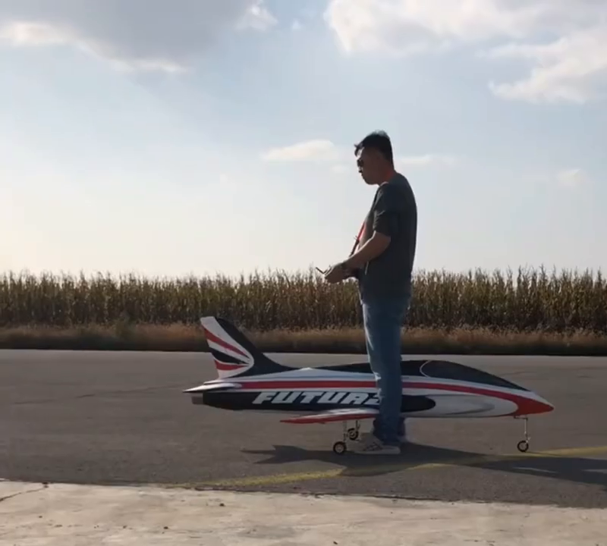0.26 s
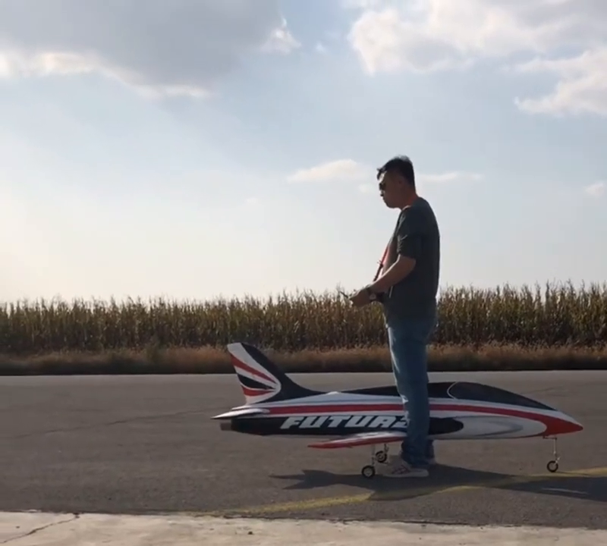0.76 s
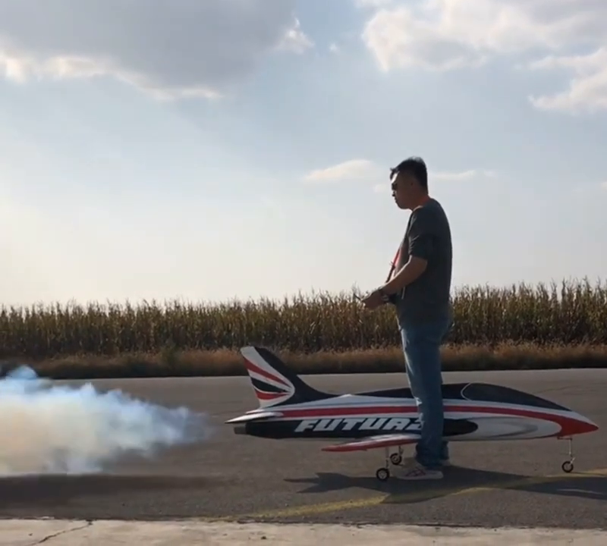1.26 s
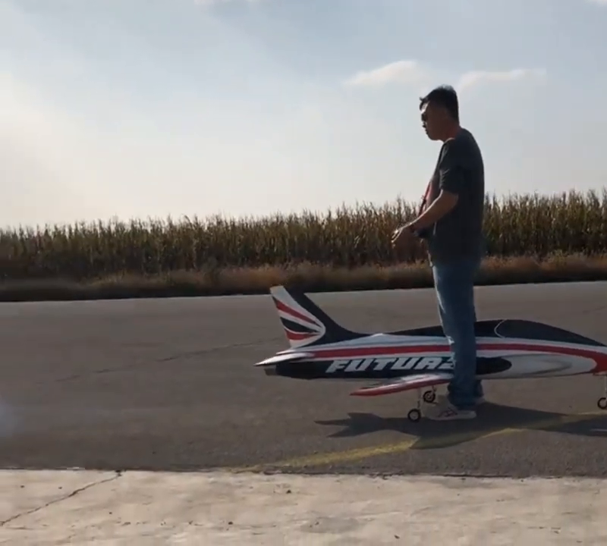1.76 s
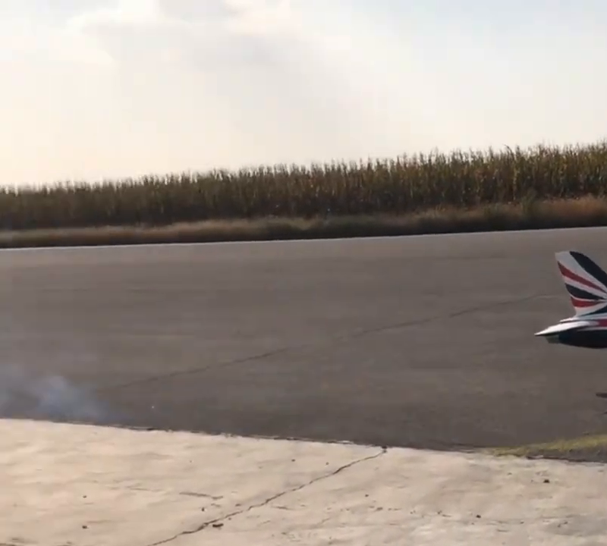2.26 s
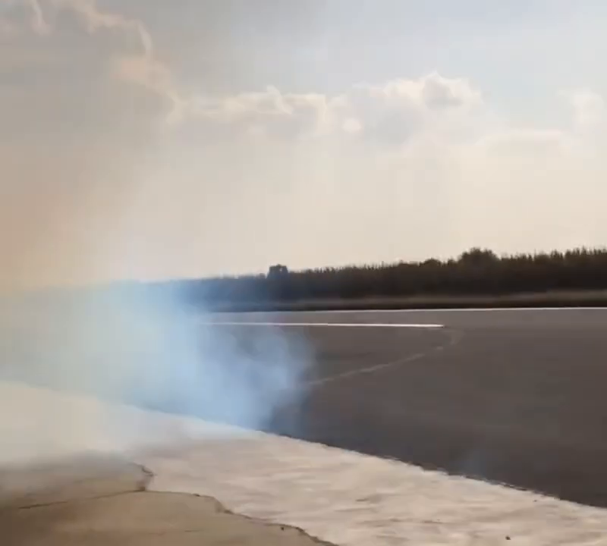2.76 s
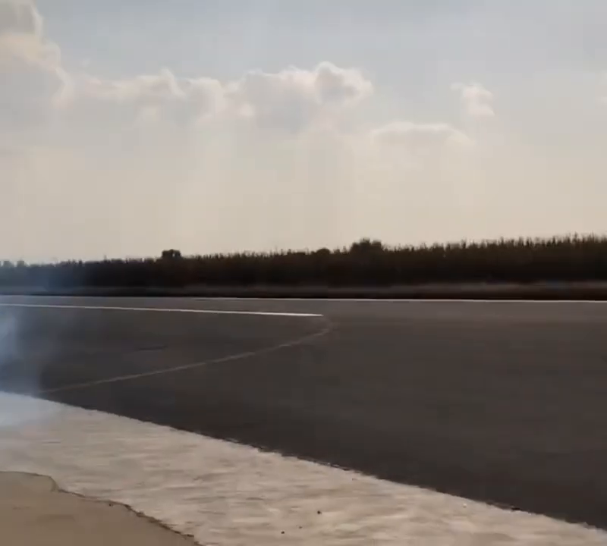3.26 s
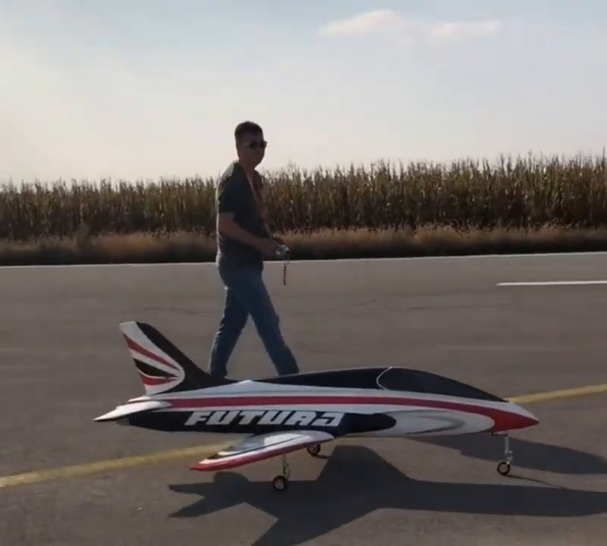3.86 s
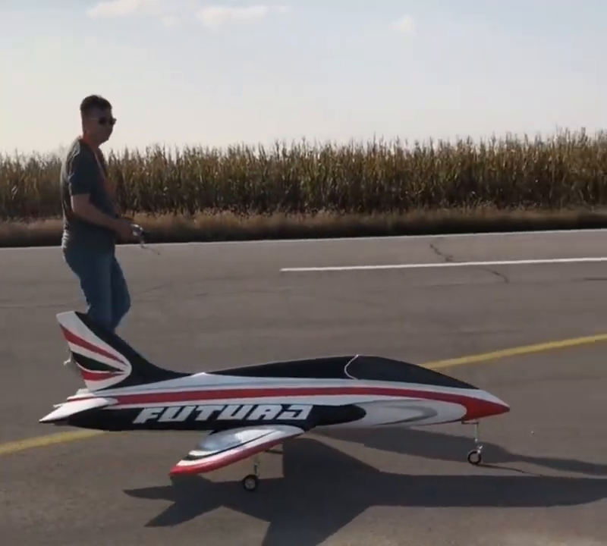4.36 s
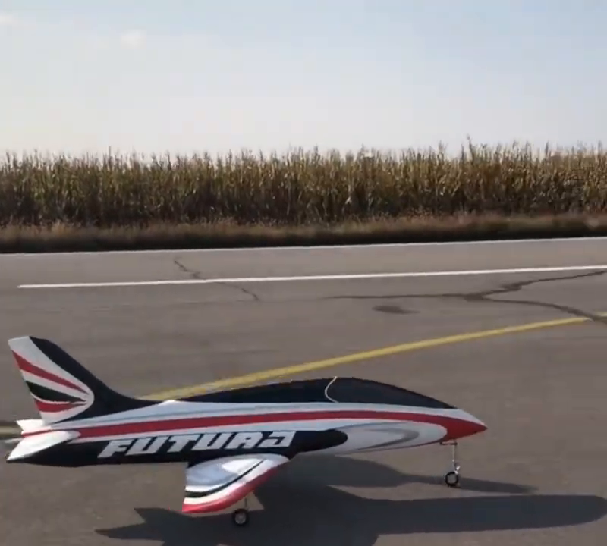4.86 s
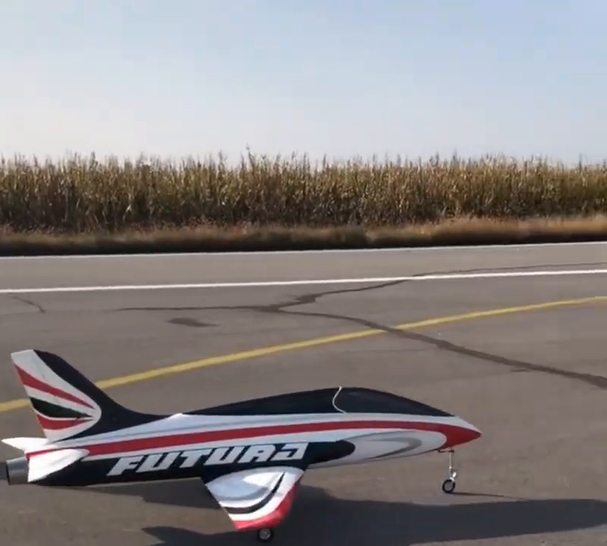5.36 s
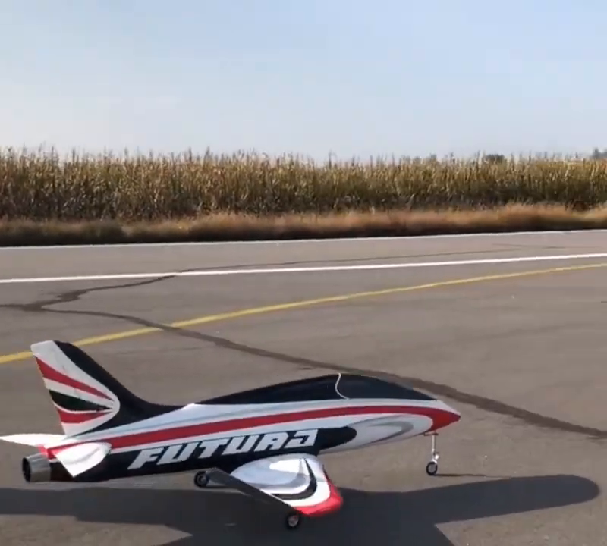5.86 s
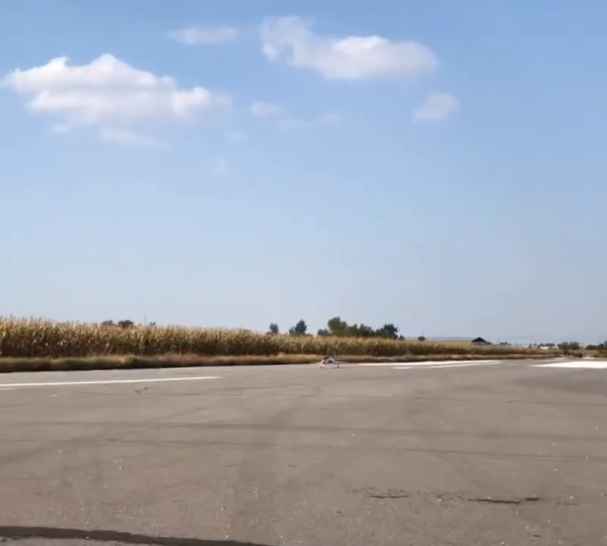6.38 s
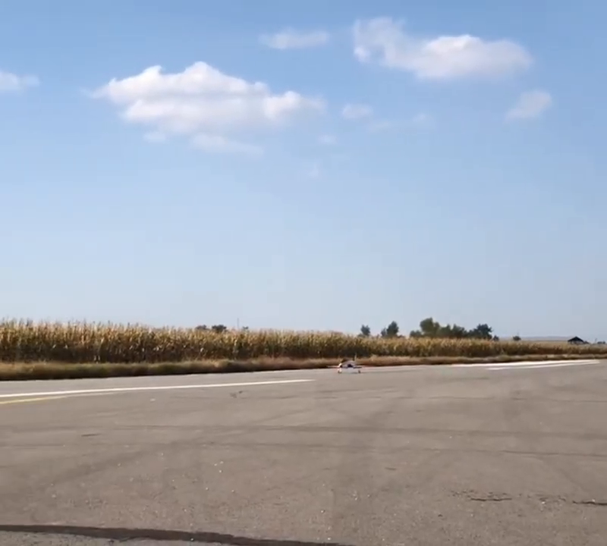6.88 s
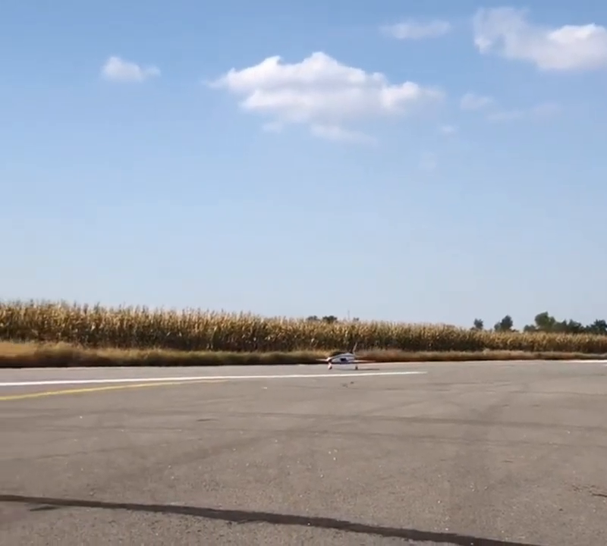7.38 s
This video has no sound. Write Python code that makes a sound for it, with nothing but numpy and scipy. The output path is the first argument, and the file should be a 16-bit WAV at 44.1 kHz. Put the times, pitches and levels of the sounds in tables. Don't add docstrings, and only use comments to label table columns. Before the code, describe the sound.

On an open asphalt runway, one handheld phone hears a brief soft far roar, a short near-silence, then a small jet turbine blasting at full thrust with a pipe howl. An abrupt cut brings a quieter rush with a high whistle sliding down in pitch and a throbbing low hum. Another cut leaves a dull distant roar that brightens, hit by wind thumps.

```python
import sys
import numpy as np
from scipy import signal
from scipy.fft import rfft, irfft, next_fast_len
from scipy.io import wavfile
from scipy.ndimage import uniform_filter1d, map_coordinates

SR = 44100
rng = np.random.default_rng(int(sys.argv[2]) if len(sys.argv) > 2 else 0)


def gain_from_db(level_db):
    decades = np.asarray(level_db, float) / 20
    return 10 ** decades


def master_out(mix):
    frames = np.transpose(np.atleast_2d(mix))
    ceiling = np.clip(frames, -1, 1)
    pcm = np.round(ceiling * 32767).astype(np.int16)
    wavfile.write(sys.argv[1], SR, pcm)


N = 336483

# [start t/s, end t/s, fade-in/ms, first fade level/dB, tail level/dB, tail fall/(dB/ms)]
VIEWS = [
    (0, .141, 1, -3, -32, 1.2),
    (.3035, 3.2765, 4, -40, -17, 2.3),
    (3.296, 6.066, 22, -15, -16, 2.0),
    (6.087, 7.7, 1, -6, -14, 2),
]
THRUST_HZ = [200, 800, 3000, 8000]
# [f/Hz, level/dB per Hz]
FAR_OFF = [(18, -47), (30, -14), (66, -13), (148, -12), (213, -6), (443, -9.5), (808, -18.5), (921, -5.5),
           (1290, -2), (1720, -16.5), (3980, -21.5), (15500, -61.5)]
FULL_POWER = [(15, -54), (60, -31), (130, -8.5), (240, -9.5), (380, -7), (800, -2.5), (1750, -0.5),
              (2080, -7), (2330, -5.5), (3300, -9.5), (7200, -9), (7700, -11), (11700, -15), (15800, -17)]
TAXI = [(15, -60), (60, -19.5), (200, -4), (400, -5), (560, -9), (850, -3.5), (1800, -13.5), (3500, -16),
        (4100, -18), (5300, -18.5), (6100, -19.5), (9000, -22.5), (13500, -26), (15800, -23.5)]
RUNWAY = [(15, -64), (40, -26), (100, -18.5), (150, -16.5), (340, -12.5), (430, -11.5), (800, -7),
          (1400, -8), (2150, -17), (2500, -23), (4500, -31.5), (7000, -37.5), (10000, -47.5), (15800, -56)]
ROAR_DB = [-26.5, -10.5, -20.5, -23.5]
# [t/s, approach (0 = stated colour, 1 = full swing)]
APPROACH = [
    [(0, .3), (.15, -0.33)],
    [(.3, -0.34), (1.3, -0.74), (1.9, 0.24), (2.4, 0.51), (3.0, 0.35), (3.3, .5)],
    [(3.3, -0.24), (3.6, -0.4), (4.5, -0.39), (4.9, -0.041), (5.4, 0.36), (6.07, 0.74)],
    [(6.09, -0.1), (6.45, 0.035), (6.65, -0.15), (6.95, 0.2), (7.3, 0.52), (7.37, 0.9), (7.5, 1),
     (7.63, 0.88)],
]
# [rumble/dB, roar/dB, rush/dB, hiss/dB]
SWING_DB = [(6, 0, 0, 17.5), (1.5, .5, -1, 2.5), (-0.5, 7.5, 6.5, 5), (-1.5, 7, 14, 12)]
PATCHY_DB = [0.71, 0.73, 0.81, 1.4]
# [delay/ms, strength 0-1]
BODY_ECHO = [(4.6, .3), (3.82, .28), (3.48, .35), (3.82, .35)]
# [t/s, delay/ms]
BOUNCE = [(0, .35), (.2, .38), (.3, .178), (1.3, .179), (1.65, .204), (2.35, .29), (2.7, .342),
          (2.95, .338), (3.28, .313), (3.3, .32), (3.9, .34), (4.3, .38), (4.7, .435), (5.15, .48),
          (6.07, .51), (6.09, .17), (7.63, .29)]
BOUNCE_TOP_HZ = [2400, 12500]
BOUNCE_SHARE = [(0.44, .34, .7, .5), (0.79, 0.72, 0.93, 0.66), (0.59, 0.86, 0.31, 0.36),
                (0.14, .17, 0.27, 0)]
# [multiple of half blade rate, idle level/dB, dB per root of excess speed, dB per approach]
TONES = [
    (1, -44.5, 12, 5),
    (2, -21.5, 0.5, -4),
    (3, -43, -14, 0),
]
TWINKLE = [0.48, .1, .4]
# [t/s, level/dB]
FADES = [(3.62, -2), (3.645, -6), (3.67, -9), (3.755, -11), (3.8, 0), (3.85, -8), (3.92, -11), (4.02, -6),
         (4.07, -13), (4.205, -8), (4.26, -14), (4.455, -17), (4.855, -1), (4.99, -14), (5.1, 5),
         (5.168, -9), (5.23, -13), (5.295, -3), (5.447, -6), (5.91, -4)]
# [t/s, f/Hz, level/dB]
HOWL = [
    (.3, 797.4, -23.5),
    (1.9, 801, -31),
    (2.2, 892, -30.5),
    (2.6, 953, -22.5),
    (3.3, 980, -25),
]
# [f/Hz, width/Hz]
CHAMBER = [
    (280.5, 32),
    (155.6, 35),
    (549.6, 30),
]
# [t/s, level above the drone/dB]
THROBS = [
    [(3.41, 6.5), (3.67, 11.5), (4.06, 12), (4.22, -4), (4.52, 11.5), (5.62, 10), (5.83, 21.5), (6.02, 11)],
    [(3.62, 6), (3.9, 5), (4.15, 6), (4.41, 9), (4.72, 9), (5.13, 12), (5.6, 5), (5.87, 3), (6.04, 6)],
    [(3.36, 9), (3.84, 3), (4.78, 10)],
]
# [t/s, level above the lull/dB]
BREEZE = [(3.36, -10), (3.44, -12), (3.52, -12), (3.7, 10), (4.15, 5), (4.47, 10), (4.57, 7), (4.92, 18),
          (5.13, 9), (5.28, 10), (5.58, 15), (5.9, 12)]
# [t/s, peak level/dB]
GUST_THUMPS = [
    (7.216, -8),
    (7.246, -2),
    (7.266, -2),
    (7.313, -2),
    (7.328, -10),
    (7.356, -1),
    (7.38, -2),
    (7.408, -2),
    (7.42, -4),
]
# [t/s, level above what is left/dB]
AFTER_PUFFS = [
    (7.49, 2),
    (7.564, 10),
]


def curve(rows, column, t):
    rows = np.asarray(rows, float)
    return np.interp(t, rows[:, 0], rows[:, column])


def set_level(x, db):
    return x * gain_from_db(db) / np.sqrt(np.mean(x ** 2))


def wander(size, rate):
    hold = max(int(SR / rate), 2)
    steps = np.repeat(rng.standard_normal(size // hold + 1), hold)
    smooth = uniform_filter1d(uniform_filter1d(steps, hold), hold)
    return 1.52 * smooth[:size]


def scatter(rate):
    return wander(N, rate) + 1j * wander(N, rate)


def swells(rows, t, length_s):
    return sum(db * np.exp(-((t - s) / length_s) ** 2) for s, db in rows)


def band(x, lo_hz, hi_hz):
    return signal.sosfilt(signal.butter(2, [lo_hz, hi_hz], "band", fs=SR, output="sos"), x)


def lowpass(x, order, top_hz):
    return signal.sosfiltfilt(signal.butter(order, top_hz, fs=SR, output="sos"), x)


def view_gate(t, start, end, fade_ms, step_db, tail_db, fall):
    rise_db = step_db * np.clip(1 - (t - start) * 1000 / fade_ms, 0, 1)
    after_db = np.where(t > end, tail_db - fall * (t - end) * 1000, 0)
    return (t >= start) * gain_from_db(np.maximum(rise_db + after_db, -200))


def breeze(t):
    lull = set_level(band(rng.standard_normal(N), 35.5, 101), -40)
    return lull * gain_from_db(swells(BREEZE, t, 0.071))


def gust(t):
    start_s, peak_s, end_s = 7.19, 7.42, 7.52
    db = np.interp(t, [start_s, peak_s, end_s], [-16, -10, -29]) + swells(AFTER_PUFFS, t, 0.01)
    rumble = set_level(band(rng.standard_normal(N), 45, 314), -6.5)
    rumble *= gain_from_db(db + 0.83 * wander(N, 40))
    rumble *= np.clip((t - start_s) / 0.053, 0, 1)
    for s, peak_db in GUST_THUMPS:
        u = (t - s - .0015) / 0.0015
        bell = np.exp(-np.minimum(u ** 2 / 2, 50))
        rumble += gain_from_db(peak_db - 2.5) * (1 - 0.76 * u ** 2) * bell
    return rumble


def far_whistle(t):
    return gain_from_db(-67) * np.sin(2 * np.pi * 9740 * t)


def excess(t):
    throttle_cut_s, spool_lag_s = 2.6102, 1.1606
    return np.exp(-(np.maximum(t - throttle_cut_s, 0) / spool_lag_s) ** 2)


def shaft(t):
    idle_hz, excess_hz = 5035.7, 4428.9
    hz = idle_hz + excess_hz * excess(t)
    return hz, 2 * np.pi * np.cumsum(hz) / SR


def combustor_hum(t):
    idle_db, speed_db = (-38.5, -30, -40), (11.5, -7, -3.5)
    wander_db, throb_s = 1.5, 0.036
    hum = np.zeros(N)
    for (hz, width), db, spool_db, throbs in zip(CHAMBER, idle_db, speed_db, THROBS):
        drone = set_level(band(rng.standard_normal(N), hz - width / 2, hz + width / 2), db)
        change_db = spool_db * np.sqrt(excess(t)) + wander_db * wander(N, 10) + swells(throbs, t, throb_s)
        hum += drone * gain_from_db(change_db)
    return hum


def tailpipe_howl(t):
    flutter = scatter(130)
    ring = np.exp(2j * np.pi * np.cumsum(curve(HOWL, 1, t)) / SR)
    return gain_from_db(curve(HOWL, 2, t)) * np.real(flutter * ring)


def blade_whistle(t):
    hz, phase = shaft(t)
    tones = 0
    for number, ((_, idle_db, speed_db, near_db), slow) in enumerate(zip(TONES, TWINKLE), start=1):
        db = idle_db + speed_db * np.sqrt(excess(t)) + near_db * curve(APPROACH[2], 1, t)
        db = db + swells(FADES, t, .012)
        audible = number * hz < .4 * SR
        scattered = slow * scatter(28) + .36 * scatter(90) + .16 * scatter(300)
        tones = tones + audible * gain_from_db(db) * np.imag((1 + scattered) * np.exp(1j * number * phase))
    return 1.12 * tones


def ground_bounce(x, t, shares):
    dull, bright = (lowpass(x, 2, hz) for hz in BOUNCE_TOP_HZ)
    path_ms = curve(BOUNCE, 1, t)
    path_ends = np.percentile(path_ms, [3, 97])
    share = np.clip(np.interp(path_ms, path_ends, shares[:2]), 0, 1)
    clear = np.clip(np.interp(path_ms, path_ends, shares[2:]), 0, 1)
    shimmer = 1 + .012 * wander(len(t), 12) + .01 * wander(len(t), 300)
    lag = path_ms * shimmer * SR / 1000
    surface = clear * bright + (1 - clear) * dull
    copy = map_coordinates(surface, [np.arange(len(t)) - lag], order=3)
    return (x + share * copy) / np.sqrt(1 + share ** 2)


def masked_hiss(roar, t):
    for above_hz, odds in ((600, .5), (1100, .7)):
        carrier = np.exp(1j * (2 * shaft(t)[1] + 2 * np.pi * above_hz * t))
        above = lowpass(roar / carrier, 6, 300)
        drop = np.clip(8 * (wander(N, 28) - odds), 0, 1) * (t > 3.33) * (t < 5.45)
        roar = roar - drop * 2 * np.real(above * carrier)
    return roar


def exhaust(t, colour, change_db, db, echo, flicker_db):
    surge_db = 0.36
    size = next_fast_len(len(t))
    octave = np.log2(np.arange(size // 2 + 1) * SR / size + 1)
    hz, colour_db = np.transpose(colour)
    eddies = rfft(rng.standard_normal(size)) * gain_from_db(np.interp(octave, np.log2(hz), colour_db))
    delay_ms, strength = echo
    delayed = np.exp(-2j * np.pi * 2 ** octave * delay_ms / 1000)
    eddies *= 1 + strength * delayed / (1 + (2 ** octave / 4500) ** 2)
    surge, roar = wander(len(t), 9.01), 0
    for centre in np.arange(4.5, 14.6, .5):
        mask = np.cos(np.pi * np.clip(octave - centre, -.5, .5)) ** 2
        share = np.array([np.interp(centre, np.log2(THRUST_HZ), row) for row in np.eye(4)])
        gain_db = share @ change_db + surge_db * surge + flicker_db * wander(len(t), 22)
        roar = roar + irfft(eddies * mask, size)[:len(t)] * gain_from_db(gain_db)
    return roar * gain_from_db(db) / np.std(irfft(eddies, size))


def scene():
    t = np.arange(N) / SR
    taxi_sounds = blade_whistle(t) + combustor_hum(t) + breeze(t)
    extras = [far_whistle(t), tailpipe_howl(t), taxi_sounds, gust(t)]
    colours = [FAR_OFF, FULL_POWER, TAXI, RUNWAY]
    roar, others = np.zeros(N), np.zeros(N)
    for k, (view, colour) in enumerate(zip(VIEWS, colours)):
        span = slice(int(view[0] * SR), int((view[1] + .04) * SR))
        now = t[span]
        gate = view_gate(now, *view)
        change_db = np.outer(SWING_DB[k], curve(APPROACH[k], 1, now))
        jet = exhaust(now, colour, change_db, ROAR_DB[k], BODY_ECHO[k], PATCHY_DB[k])
        roar[span] += gate * ground_bounce(jet, now, BOUNCE_SHARE[k])
        others[span] += gate * extras[k][span]
    return np.tile(masked_hiss(roar, t) + others, (2, 1))


def low_pass(x):
    return signal.sosfilt(signal.butter(12, 16090, fs=SR, output="sos"), x)


def record(dry):
    treble = band(dry, 9000, 16500)
    image_hz = 48000 - 44100
    images = treble * np.cos(2 * np.pi * image_hz * np.arange(N) / SR)
    x = dry + gain_from_db(-15) * band(images, 11000, 19000) + gain_from_db(-28) * images
    x = signal.sosfilt(signal.butter(2, 45, "high", fs=SR, output="sos"), x)
    x = signal.sosfilt(signal.ellip(10, .2, 80, 15480, fs=SR, output="sos"), x)
    x = np.clip(1.35 * np.tanh(x / 1.2), -1, 1)
    return low_pass(x)


dry = scene()
out = record(dry)
master_out(out)
```